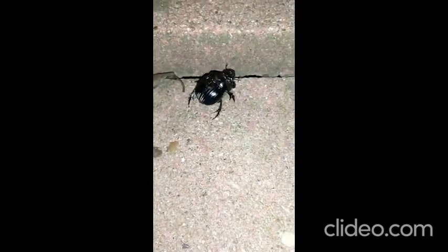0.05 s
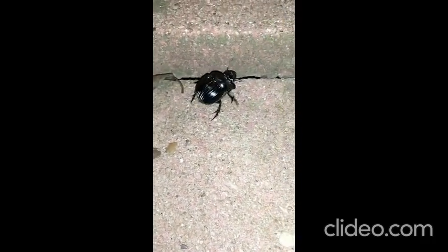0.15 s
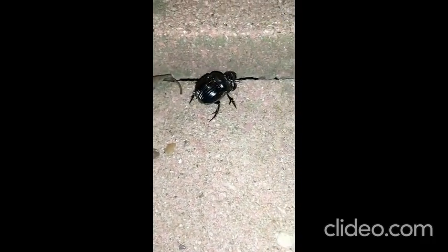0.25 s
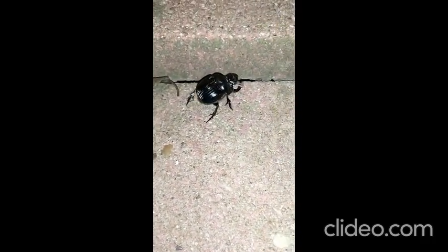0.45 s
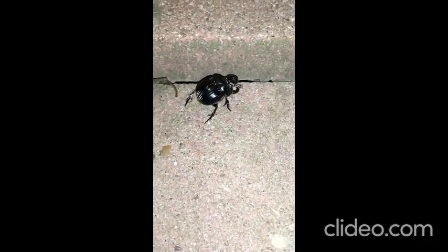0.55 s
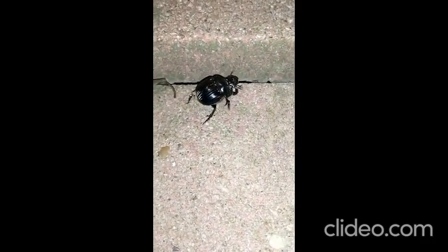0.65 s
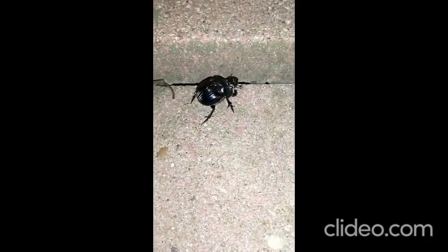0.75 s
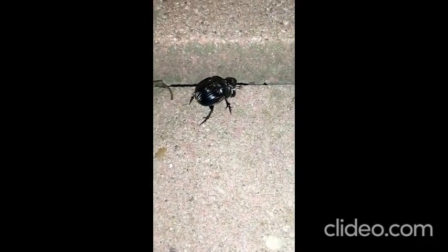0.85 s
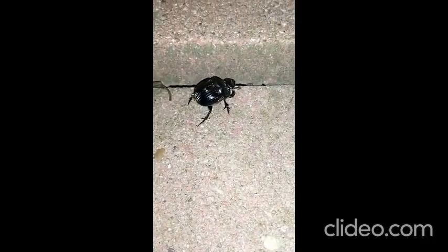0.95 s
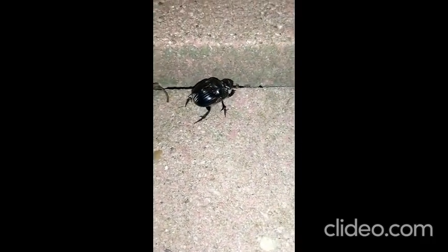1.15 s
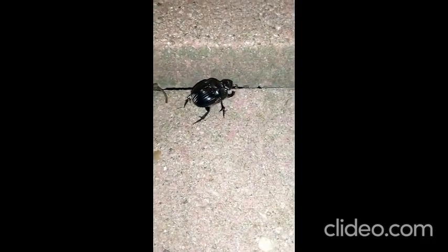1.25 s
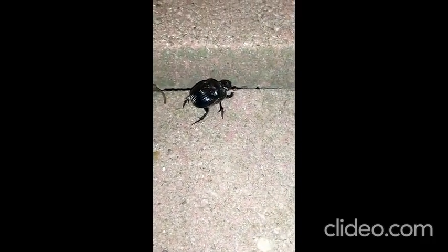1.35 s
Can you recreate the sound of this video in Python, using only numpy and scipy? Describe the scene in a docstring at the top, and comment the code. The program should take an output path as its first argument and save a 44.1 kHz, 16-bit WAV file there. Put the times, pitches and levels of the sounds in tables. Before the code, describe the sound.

A sharp handling click with a short thud hits the phone's microphone on the left, just after a faint tick. Around it lies quiet outdoor background: distant town noise, a low machine hum and very faint crickets.

```python
"""First comes a quiet outdoor bed: distant town noise, a low machine hum, microphone hiss and crickets.
A hand shifts on the phone: a faint tick, then one loud click, both in the left microphone only.
Each is a sudden step of pressure that the microphone's bass cut turns into a snap with a short thud.
The bed dips just before the loud click and swells briefly after it. Very faint far-off yelps follow."""
import sys
import numpy as np
from scipy import signal
from scipy.fft import rfft, irfft
from scipy.io import wavfile

SR = 44100
rng = np.random.default_rng(int(sys.argv[2]) if len(sys.argv) > 2 else 0)


def wav_record(signal):
    """Record a signal, one row per channel, as 16-bit PCM in the file named by sys.argv[1]."""
    frames = np.transpose(np.atleast_2d(signal))
    bounded = np.clip(frames, -1, 1)
    # unit amplitude maps onto the largest positive 16-bit level
    quanta = np.round(bounded * 32767).astype(np.int16)
    wavfile.write(sys.argv[1], SR, quanta)


N = 61739

# spectral shape of the distant town: frequency_hz, relative_density_db
TOWN_SPECTRUM = [(20, -24.5), (33, -21), (52, -7), (78, 2.5), (110, -2), (160, -5), (240, -6.5),
                 (310, -10.5), (430, -11), (560, -17.5), (700, -12.5), (1000, -16.5), (1300, -21),
                 (1600, -23.5), (2500, -32), (5000, -48.5), (16000, -65.5)]
# likeness of left and right in the town noise and the hiss: frequency_hz, correlation_ratio
STEREO_CORRELATION = [(60, 0.8), (130, .96), (290, 1), (640, 0.5), (1400, 0), (4500, 0.02), (6800, .4),
                      (10000, .95)]
# envelope of the machine hum, before the swell: time_s, level_db
HUM_ENVELOPE = [(0, -63), (.2, -58), (.4, -59.5), (.55, -61.5), (.72, -63.5), (.88, -60), (1.03, -59),
                (1.2, -62), (1.4, -57.5)]
# faint drones in the town noise, before the swell: centre_hz, width_hz, level_db
DRONE_BANDS = [(377.5, 7.5, -80.5), (1502, 70, -88)]
# spectral shape of the microphone hiss: frequency_hz, relative_density_db
HISS_SPECTRUM = [(100, 7), (3000, -1), (4200, 3), (5000, -0.5), (8000, -2), (15600, -3.5), (16000, -20)]
# pressure steps of the tick and the click, before filtering: start_s, height_db
PRESSURE_STEPS = [(0.1964, -34), (0.2352, -1.98)]
# dip and swell of town, hum, drones and yelps around the loud click: time_s, gain_db
LOW_SWELL = [(.21, -2.5), (.228, 1), (.243, 5.5), (.272, 5.5), (.297, -1), (.39, 1), (.44, -1.5)]
# dip and swell of hiss and crickets, rising less and for longer: time_s, gain_db
TREBLE_SWELL = [(.21, -0.5), (.226, -5.5), (.245, 1.5), (.28, 1), (.39, 2.5), (.46, 0)]
# far-off yelps, before the swell: peak_s, level_db
YELP_PEAKS = [(0.92, -71), (1.015, -71.5), (1.093, -68.5), (1.144, -66), (1.211, -68), (1.299, -65.5),
              (1.355, -66.5)]

BIN_HZ = np.fft.rfftfreq(N, 1 / SR)


def undb(db):
    """Amplitude ratio of a level in decibels."""
    return 10 ** (np.asarray(db) / 20)


def gain_at(rows, t):
    """Amplitude envelope of a level interpolated linearly in decibels."""
    return undb(np.interp(t, *np.array(rows).T))


def by_frequency(rows):
    """A table interpolated at every bin, on a logarithmic frequency axis."""
    hz, value = np.array(rows).T
    return np.interp(np.log(BIN_HZ + 1), np.log(hz), value)


def noise(gain):
    """Spectral shaping: filtered white noise, scaled to rms 1."""
    x = irfft(rfft(rng.standard_normal(N)) * gain, N)
    return x / np.std(x)


def band_noise(centre_hz, width_hz):
    """Narrow-band noise: a Gaussian amplitude spectrum whose standard deviation is width_hz."""
    return noise(np.exp(-.5 * ((BIN_HZ - centre_hz) / width_hz) ** 2))


def stereo_noise(spectrum):
    """Partial coherence: shared and opposed noises mix into two partly alike sides, rms 1 overall."""
    correlation = by_frequency(STEREO_CORRELATION)
    mid, side = rfft(rng.standard_normal((2, N))) * undb(by_frequency(spectrum))
    shared = mid * np.sqrt(1 + correlation)
    opposed = side * np.sqrt(1 - correlation)
    x = irfft(np.array([shared + opposed, shared - opposed]), N)
    return x / np.std(x)


def town(left_lead_db=3):
    """Distant town noise, mostly bass; a level difference between the ears sets it to the left."""
    return stereo_noise(TOWN_SPECTRUM) * undb(-65 + np.array([[.5], [-.5]]) * left_lead_db)


def machine_hum(t, pitch_hz=119.9, wander_ratio=.004, wander_hz=4):
    """Frequency modulation: the one low tone of a distant machine wavers slowly at random."""
    wander = noise(np.exp(-(BIN_HZ / wander_hz) ** 2))
    phase = 2 * np.pi * np.cumsum(pitch_hz * (1 + wander_ratio * wander)) / SR
    return np.sqrt(2) * np.sin(phase) * gain_at(HUM_ENVELOPE, t)


def drones():
    """Far-off machine noise confined to narrow bands is heard as faint pitches."""
    return sum(undb(db) * band_noise(centre_hz, width_hz) for centre_hz, width_hz, db in DRONE_BANDS)


def microphone_hiss():
    """Self-noise of the microphones: random fluctuation over a broad band."""
    return stereo_noise(HISS_SPECTRUM) * undb(-81.5)


def crickets(pitch_hz=4308, width_hz=135):
    """Incoherent summation: many far-off crickets merge into one thin band, different in each ear."""
    return undb(-86) * np.array([band_noise(pitch_hz, width_hz) for _ in range(2)])


def handling_clicks(leak_hz=60, leak_q=1, bass_cut_hz=77.5, soft_hz=4140):
    """Step response of a high-pass: pressure jumps and leaks away, dispersed by the phone's case."""
    hz = np.maximum(BIN_HZ, 1e-3)
    impulses = sum(undb(db) * np.exp(-2j * np.pi * hz * start_s) for start_s, db in PRESSURE_STEPS)
    integrator = 1 / (2j * np.sin(np.pi * hz / SR))  # turns each impulse into a step
    s = 1j * hz / leak_hz
    leak = s ** 2 / (s ** 2 + s / leak_q + 1)
    bass_cut = 1 - (1 - undb(-21.5)) * np.exp(-(hz / bass_cut_hz) ** 3)
    soft_contact = undb(-5 / (1 + (soft_hz / hz) ** 4))
    case_lag_s = .0009 * np.exp(-((hz - 3900) / 1550) ** 2)  # the case delays this band: a tiny chirp
    snap_lead_s = .00062 / (1 + (6780 / hz) ** 20)  # the top treble comes just ahead of the step
    group_delay_s = case_lag_s - snap_lead_s
    dispersion = np.exp(-2j * np.pi * np.cumsum(group_delay_s) * SR / N)
    return irfft(impulses * integrator * leak * bass_cut * soft_contact * dispersion, N)


def yelps(t, pitch_hz=718, width_hz=63.4, half_length_s=.018):
    """Short calls, perhaps a dog, blurred by distance to one resonance."""
    envelope = sum(undb(db) * np.exp(-((t - peak_s) / half_length_s) ** 2) for peak_s, db in YELP_PEAKS)
    shared, left, right = (band_noise(pitch_hz, width_hz) for _ in range(3))
    return envelope * (shared + np.array([left, right])) / np.sqrt(2)


def scene():
    """Superposition: the quiet bed in both ears, the clicks on the left."""
    t = np.arange(N) / SR
    low = town() + machine_hum(t) + drones() + yelps(t)
    treble = microphone_hiss() + crickets()
    bed = low * gain_at(LOW_SWELL, t) + treble * gain_at(TREBLE_SWELL, t)
    return bed + np.array([[1], [0]]) * handling_clicks()


def record(dry, cutoff_hz=16000):
    """Band limiting: the phone cuts the top treble with a steep low-pass."""
    return signal.sosfiltfilt(signal.ellip(8, .05, 50, cutoff_hz, fs=SR, output="sos"), dry)


dry = scene()
out = record(dry)
wav_record(out)
```